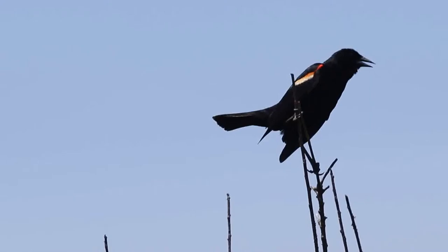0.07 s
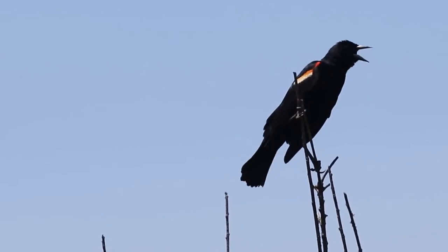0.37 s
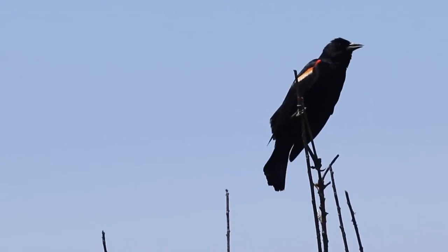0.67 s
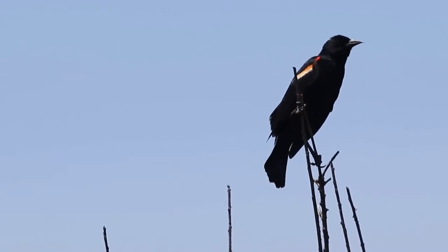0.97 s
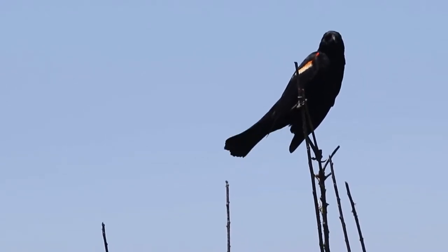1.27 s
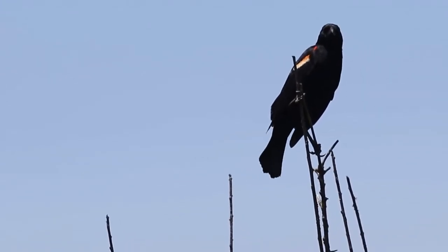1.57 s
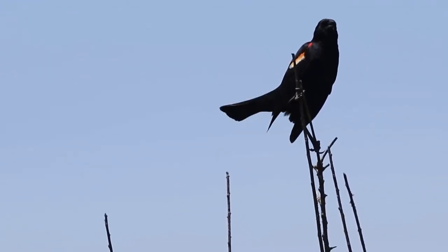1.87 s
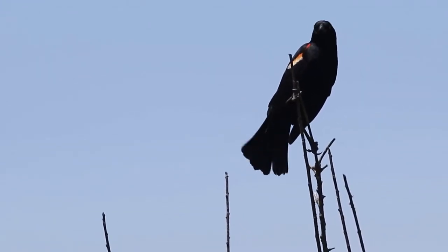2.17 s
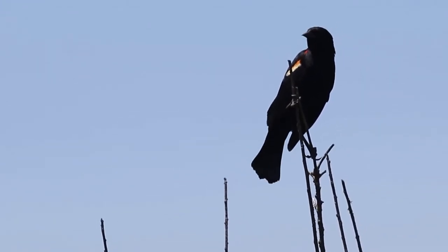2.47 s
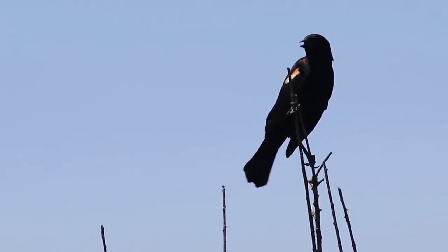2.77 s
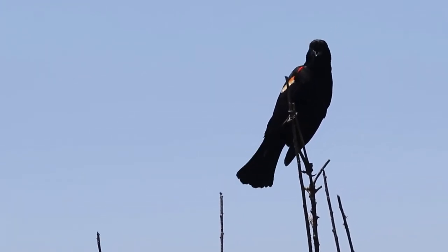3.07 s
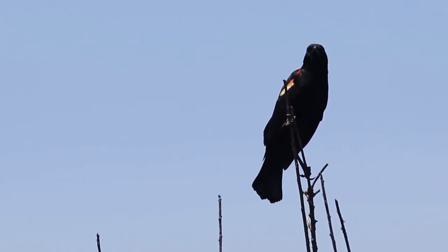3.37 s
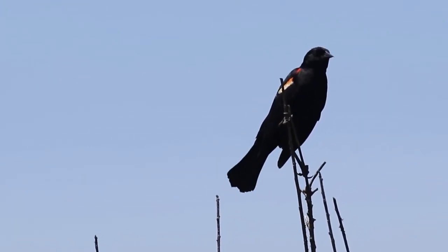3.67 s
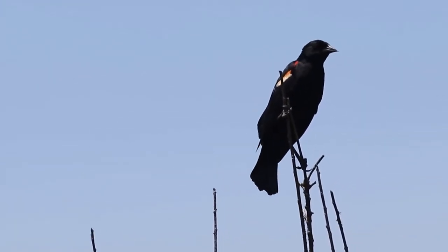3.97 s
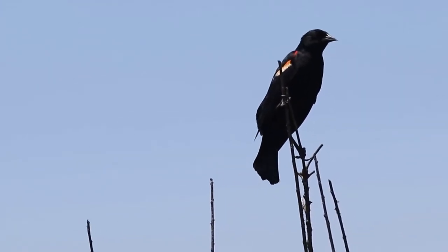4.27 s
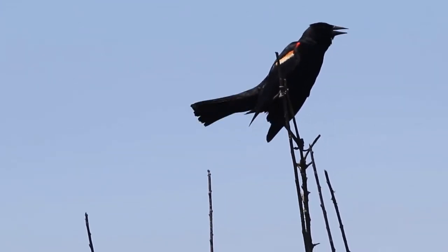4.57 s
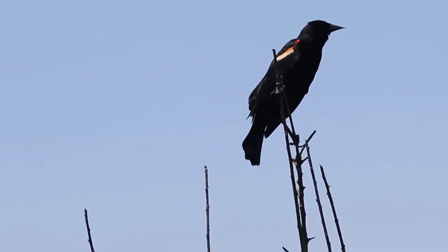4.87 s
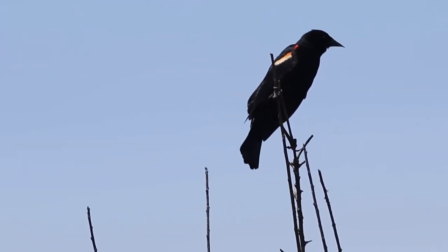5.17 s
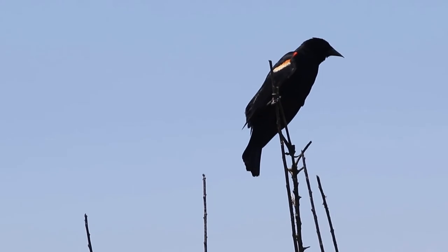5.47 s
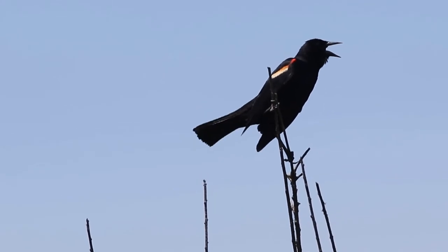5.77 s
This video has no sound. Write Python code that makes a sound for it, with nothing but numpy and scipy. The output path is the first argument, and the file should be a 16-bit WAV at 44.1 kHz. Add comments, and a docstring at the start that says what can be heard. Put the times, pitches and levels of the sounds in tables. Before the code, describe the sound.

A red-winged blackbird calls loudly and close by in the open air, with only a faint echo. A short, sharp, buzzy chuck comes at 0.1 seconds, followed from 0.4 to 0.7 by three quick, high, falling whistles. A second loud chuck sounds at 1.9 seconds. The triple whistle returns from 3.0 to 3.3, with a small cluster of soft, gritty knocks under its start. A third chuck comes at 4.6, and a last triple whistle runs from 5.7 to about 6 seconds. In the gaps, distant birds answer with faint chucks, tiny chirps and thin, echoing whistles. Feathers rustle very briefly near 1.7 and 3.4 seconds, and soft, dull low bumps fall around 0.5, 1.8 and 4.9. Throughout, distant traffic makes a low rumble with a faint tyre whine, slowly receding beneath a thin hiss of air.

```python
"""Short buzzy chucks and runs of three falling 'tew' whistles: a red-winged blackbird by a pond.
Both sides of its syrinx sound through one throat; reeds, the far bank and trees send back a faint echo.
Other birds answer from further off, feathers rustle, and there are a few soft knocks and dull bumps.
Distant traffic rumbles underneath, slowly receding."""
import sys
import numpy as np
from scipy import signal
from scipy.fft import rfft, irfft
from scipy.io import wavfile
from scipy.ndimage import map_coordinates

SR = 44100
rng = np.random.default_rng(int(sys.argv[2]) if len(sys.argv) > 2 else 0)


def generate_wav(signal):
    """Clip the signal to [-1, 1] and save it as 16-bit WAV at the path in sys.argv[1]."""
    frames = np.transpose(np.atleast_2d(signal))
    scaled = np.clip(frames, -1, 1) * 32767
    pcm = np.round(scaled).astype(np.int16)
    wavfile.write(sys.argv[1], SR, pcm)


N = 261513
TIME = np.arange(N) / SR
FLICK_S = .0016  # how fast a tew flicks upward as it cuts off
# Overtones of a whistling membrane. Each row: multiple of the pitch, level in dB.
WHISTLE_OVERTONES = [(2, -25.5), (3, -20.5), (4, -27)]


def blackbirds():
    """The near bird's runs of tews and three loud chucks, with four faint chucks from further off."""
    # Each row: start and length in seconds, settled pitch in Hz, late curl and closing flick as shares
    # of the pitch, level in dB, overtones in dB, their fade in dB per second as the beak closes.
    tews = [(.375, 0.11, 3677, .005, .12, -13, -3.5, 6),
            (.488, 0.11, 3584, -0.0081, 0.089, -11.5, -6.5, 14),
            (.601, 0.13, 3499, -0.011, 0.022, -12.5, -1, 298),
            (2.953, 0.1, 3833, 0.029, 0.063, -11.5, -4, 0),
            (3.061, 0.11, 3759, .033, 0.082, -12.5, -2.5, -2),
            (3.172, 0.14, 3772, 0.0077, 0.011, -13, 0, 170),
            (5.688, 0.11, 3774, 0.022, .12, -12.5, -1.5, 18),
            (5.796, 0.11, 3650, 0.028, 0.11, -13, -2.5, 6), (5.907, 0.13, 3580, -0.0025, 0, -14.5, -1, 200)]
    # Near and far chucks. Each row: start in seconds, pitch in Hz, tick, buzz and overtones in dB.
    chucks = [(0.1161, 2570, -14, -19.5, 0), (1.516, 2590, -47, -54, -6), (1.9119, 2528, -13, -19, -1.5),
              (2.2603, 2465, -34, -44.5, -8), (4.034, 2520, -46.5, -71, -10),
              (4.6222, 2532, -15, -19.5, -2.5), (4.909, 2470, -37.5, -48, -12)]
    out = np.zeros(N)
    for start, length, hz, curl, flick, db, overtone_db, fade_db_per_s in tews:
        add(out, start, undb(db) * tew(length, hz, curl, flick, overtone_db, fade_db_per_s))
    for start, *call in chucks:
        add(out, start, chuck(*call))
    return out


def tew(length, hz, curl, flick, overtone_db, fade_db_per_s):
    """The high side of the syrinx starts, the low side joins and clashes with it, then holds alone."""
    t = clock(length)
    settled_s, clash_s = .032, .018
    # the beak narrows as the pitch settles; on a run's last note it closes and shuts the overtones in
    beak_db = overtone_db * np.minimum(t / settled_s, 1) - fade_db_per_s * np.maximum(t - settled_s, 0)
    low = low_side(t, length, hz, curl, flick, beak_db, clash_s)
    high = high_side(t, hz)
    # the two sides share one air stream, which adds their sum tone
    sum_tone = signal.sosfilt(signal.butter(4, 10000, "high", fs=SR, output="sos"), low * high)
    rasp = noise([(2500, -26), (4000, 8.5), (7000, 10), (9500, -5), (13000, -11), (16000, -33)], 8192)
    clash = undb(-24.5 - 398.5 * abs(t - clash_s))
    cutoff = undb(-19.5) * np.exp((t - length) / FLICK_S)
    return low + high + undb(4.5) * sum_tone + undb(beak_db) * (clash + cutoff) * rasp[:len(t)]


def high_side(t, hz):
    """The bright squeak that opens a tew: nearly an octave up, swinging as it sinks."""
    swing_hz, sink_per_s = 90, 3.5
    pitch = hz * (1.88 - sink_per_s * t + .14 * np.cos(2 * np.pi * swing_hz * t))
    effort = envelope(t, attack_s=.0042, hold_s=.00067, release_s=.012, rise_db=15, fall_db=22)
    return syrinx(t, pitch, undb(.5) * effort, undb(17.5) * effort, WHISTLE_OVERTONES, jitter=.009)


def low_side(t, length, hz, curl, flick, beak_db, clash_s):
    """The body of a tew: it enters a fifth high, relaxes down to its pitch, swells and holds."""
    enters_s, swell_s, release_s = .006, .028, .29 * length
    slide_starts_s, slide_s = .0117, .0098
    slide = .49 * np.exp(-np.maximum(t - slide_starts_s, 0) / slide_s)
    ending = curl * hump(t, .763 * length, width=.0094) + flick * np.exp((t - length) / FLICK_S)
    drift = .002 * walk(t, 120)
    pitch = hz * (1 + slide + ending + drift)
    jitter = .002 + .028 * np.exp(-t / .013)
    hold_s = length - enters_s - swell_s - release_s
    effort = envelope(t - enters_s, swell_s, hold_s, release_s, rise_db=6.5, fall_db=26.5)
    # the overtones start grainy, clear up, and linger while the fundamental fades
    grain = 1 + .98 * np.exp(-t / .032) * walk(t, 2500)
    edge = undb(6 + beak_db) * effort ** .099 * grain
    stutter_db = 2.5 * walk(t, 450) * hump(t, clash_s, width=.009)
    return undb(stutter_db) * syrinx(t, pitch, undb(1.12) * effort, edge, WHISTLE_OVERTONES, jitter)


def chuck(hz, tick_db, buzz_db, overtone_db):
    """A high sagging tick, a break, then a lower climbing note that a fast warble turns into a buzz."""
    # Overtones of the buzzing membrane. Each row: multiple of the pitch, level in dB.
    buzz_overtones = [(2, -31), (3, -17), (4, -36), (5, -29), (6, -40)]
    break_s, warble_starts_s, warble_hz = .0165, .026, 256
    t = clock(.07)
    sag = .11 * (1 - np.exp(-t / .006))
    effort = envelope(t, attack_s=.0014, hold_s=.0033, release_s=.01, rise_db=12, fall_db=33)
    edge = undb(10 + overtone_db) * effort
    tick = syrinx(t, hz * (1.525 - sag), effort, edge, WHISTLE_OVERTONES, jitter=.0048)

    age = t - break_s
    warble = np.sin(2 * np.pi * warble_hz * np.maximum(t - warble_starts_s, 0))
    climb = .14 * (1 - np.exp(-np.maximum(age, 0) / .02))
    pitch = hz * (1 + climb) * (1 + .058 * warble)
    effort = envelope(age, attack_s=.0013, hold_s=.027, release_s=.02, rise_db=16, fall_db=16.5)
    effort *= 1 - .25 * warble
    clean_accent = undb(8.5 * hump(t, centre=.0214, width=.0028))
    edge = undb(overtone_db - 4) * effort
    buzz = syrinx(t, pitch, clean_accent * effort, edge, buzz_overtones, jitter=.016)
    # the membrane rasps as it changes register
    rasp = noise([(2000, -27), (3500, 16), (6000, 1), (8500, 2), (13000, 7), (16000, -7)], 4096)
    rasp_db = overtone_db - 21 - 682 * abs(age)
    return undb(tick_db) * tick + undb(buzz_db) * (buzz + undb(rasp_db) * rasp[:len(t)])


def syrinx(t, hz, tone_gain, overtone_gain, harmonics, jitter):
    """One vibrating membrane: an unsteady tone whose harmonics sweep through the throat's resonances."""
    # Resonance of the throat and open beak. Each row: frequency in Hz, gain in dB.
    throat = [(2600, -0.5), (3800, 0.5), (5000, -2.5), (6600, -3.5), (7600, -4.5), (9500, -7), (11000, -10),
              (13000, -4), (15500, -12)]
    pitch = hz * (1 + jitter * walk(t, 1486))
    phase = 2 * np.pi * np.cumsum(pitch) / SR
    fundamental = gain_at(pitch, throat) * np.sin(phase)
    overtones = sum(undb(db) * gain_at(k * pitch, throat) * (k * pitch < SR / 2) * np.sin(k * phase)
                    for k, db in harmonics)
    shimmer = undb(4 * walk(t, 122))
    flutter = undb(.6 * walk(t, 170))
    return flutter * (tone_gain * fundamental + overtone_gain * shimmer * overtones)


def far_birds():
    """Neighbours across the pond: tews, triple chirps and thin whistles."""
    # Each row: start in seconds, length in seconds, settled pitch in Hz, level in dB.
    far_tews = [(1.581, 0.088, 4000, -57), (2.12, 0.1, 4160, -46.5), (2.219, 0.13, 4094, -49),
                (2.338, 0.12, 4100, -47.5), (3.406, 0.13, 3990, -43.5), (4.734, .1, 4880, -54)]
    # A small bird's triple chirps. Each row: start in seconds, level in dB.
    chirps = [(.225, -57), (1.317, -57.5), (1.705, -52), (2.028, -58), (2.405, -53), (2.675, -54.5),
              (3.795, -56), (4.158, -58.5), (4.775, -56), (5.058, -53.5)]
    # Each row: start and length in seconds, first and last pitch in Hz, level in dB,
    # waver as a share of the pitch.
    whistles = [(1.795, 0.16, 3360, 3630, -53.5, 0.0052), (2.66, 0.059, 2920, 3140, -52, 0.0065),
                (2.785, .04, 3120, 2850, -57, .006), (2.88, 0.051, 2840, 2640, -54, .006),
                (4.892, .11, 4640, 4580, -57.5, 0.0033), (5.346, .07, 5560, 5530, -61, 0.021),
                (5.44, 0.03, 4950, 4850, -60, .006), (5.585, 0.13, 5680, 5430, -56, 0.023)]
    answers = np.zeros(N)
    for start, length, hz, db in far_tews:
        add(answers, start, undb(db) * tew(length, hz, curl=0, flick=0, overtone_db=-11, fade_db_per_s=0))
    # distance takes the top off their notes
    out = signal.sosfilt(signal.butter(4, 5000, fs=SR, output="sos"), answers)
    for start, db in chirps:
        for k in range(3):
            add(out, start + k * .035, undb(db) * whistle(.015, start_hz=5350, end_hz=4870, waver=.006))
    for start, length, start_hz, end_hz, db, waver in whistles:
        add(out, start, undb(db) * whistle(length, start_hz, end_hz, waver))
    return out


def whistle(length, start_hz, end_hz, waver):
    """A pure, wavering glide that swells and fades."""
    t = clock(length)
    pitch = (start_hz + (end_hz - start_hz) * t / length) * (1 + waver * walk(t, 307))
    return np.sin(np.pi * t / length) * np.sin(2 * np.pi * np.cumsum(pitch) / SR)


def rustles():
    """Feathers brush past each other as the bird flicks its tail."""
    # Each row: start in seconds, length in seconds, level in dB.
    tail_flicks = [(1.692, 0.045, -40), (3.37, 0.038, -38)]
    # Colour of brushing feathers. Each row: frequency in Hz, level in dB.
    feathers = [(1500, -28), (2800, -10), (3800, 6), (5500, -14), (9000, -24), (13000, -27), (16000, -45)]
    out = np.zeros(N)
    for start, length, db in tail_flicks:
        t = clock(length)
        brush = np.sin(np.pi * t / length) * undb(db + 2 * walk(t, 333))
        add(out, start, brush * noise(feathers, 4096)[:len(t)])
    return out


def knocks():
    """Soft, gritty knocks: bursts of noise ring a dull body under a dry top."""
    # Each row: start in seconds, decay in seconds, level in dB, boost of the two low modes in dB.
    hits = [(3.0232, 0.0059, -23.5, 0.5), (3.0467, 0.0039, -25, 0), (3.091, 0.0097, -35.5, 7),
            (3.1007, .003, -24, -12)]
    # Each row: frequency in Hz, bandwidth in Hz, level in dB.
    modes = [(368, 76, 0.5), (1090, 700, -2), (2080, 480, -1)]
    out, t = np.zeros(N), clock(.06)
    for start, decay, db, body_db in hits:
        grit = rng.standard_normal(len(t)) * np.exp(-t / decay)
        for k, (hz, width, mode_db) in enumerate(modes):
            b, a = signal.iirpeak(hz, hz / width, fs=SR)
            ring = signal.lfilter(b, a, signal.lfilter(b, a, grit)) * np.sqrt(SR / width / 2)
            add(out, start, undb(db + mode_db + body_db * (k < 2)) * ring)
    return out


def bumps():
    """Dull low swells, each only a few cycles long."""
    # Each row: centre in seconds, width in seconds, pitch in Hz, level in dB.
    swells = [(.505, 0.022, 93.5, -28), (1.83, 0.0047, 161, -22), (4.581, .008, 169, -38),
              (4.912, 0.014, 113, -30.5)]
    return sum(undb(db) * hump(TIME, centre, width) * np.sin(2 * np.pi * hz * (TIME - centre))
               for centre, width, hz, db in swells)


def pond_echo(sound, reeds_db, echo_s, echo_db, tail_db, t60):
    """Reeds scatter at once, the bank gives a ragged echo, and the trees beyond a long thin tail."""
    t = clock(1.6)
    reeds, bank, trees = rng.standard_normal((3, len(t)))
    reeds *= np.exp(-t / .085) * (t > .006)
    bank *= np.exp(-abs(t - echo_s) / .016) * (t > echo_s)
    # the tree line across the water makes the tail swell once more
    swell_db = 5 * hump(t, centre=.52, width=.07)
    trees *= undb(-60 * t / t60 + swell_db) * np.minimum(t / echo_s, 1)
    response = undb(reeds_db) * unit(reeds) + undb(echo_db) * unit(bank) + undb(tail_db) * unit(trees)
    # leaves and air soak up the overtones
    response = signal.sosfilt(signal.butter(4, 5200, fs=SR, output="sos"), response / np.sqrt(len(t)))
    return signal.fftconvolve(sound, response)[:N]


def traffic():
    """Far engines rumble and drone; tyres roar and whine as they recede."""
    # Colours of the road and of the tyre whine. Each row: frequency in Hz, level in dB.
    road_colour = [(12, -44), (20, -22), (38, -11.5), (53, -3), (81, -1.5), (120, -3), (225, -4),
                   (258, -6.5), (346, -6.5), (430, -10), (456, -9), (963, -9), (1840, -16.5), (2200, -25.5),
                   (2860, -62), (4840, -120)]
    whine_colour = [(700, -10), (880, 9), (960, 13), (1030, 9.5), (1200, -34.5)]
    road = noise(road_colour, N)
    lows = signal.sosfiltfilt(signal.butter(3, 350, fs=SR, output="sos"), road)
    rumble = unit(lows) * receding(-36, fade_db_per_s=.4) * undb(.5 * walk(TIME, 9.2))
    roar = unit(road - lows) * receding(-37.5, fade_db_per_s=.25) * undb(.39 * walk(TIME, 5.58))
    whine = noise(whine_colour, N) * receding(-44, fade_db_per_s=1.1)
    engine_hz = 71.6 * (1 + .027 * walk(TIME, 9))
    drone = undb(-43.5 + 1.5 * walk(TIME, 2.48)) * np.sin(2 * np.pi * np.cumsum(engine_hz) / SR)
    return rumble + roar + whine + drone


def air():
    """A thin, steady hiss of open air."""
    # Each row: frequency in Hz, level in dB.
    hiss_colour = [(1500, -14.5), (2200, 3), (3000, -4), (4000, -10.5), (6000, -15), (10000, -17.5),
                   (16000, -25)]
    return undb(-55) * noise(hiss_colour, N)


def receding(start_db, fade_db_per_s):
    """Gain of a source that slowly moves away."""
    return undb(start_db - fade_db_per_s * TIME)


def envelope(t, attack_s, hold_s, release_s, rise_db, fall_db):
    """Gain that climbs, holds and falls away, gated with half-millisecond edges."""
    attack = np.clip(1 - t / attack_s, 0, 1)
    release = np.maximum(t - attack_s - hold_s, 0) / release_s
    gate = np.clip(np.minimum(t, attack_s + hold_s + release_s - t) / .0005, 0, 1)
    return undb(-rise_db * attack - fall_db * release) * gate


def hump(t, centre, width):
    """A bell-shaped swell of height 1."""
    return np.exp(-((t - centre) / width) ** 2)


def walk(t, rate):
    """A smooth random wobble of spread near 1, with rate steps a second."""
    return map_coordinates(rng.standard_normal(512), [t * rate], order=3, mode="wrap")


def noise(spectrum, size):
    """Noise of rms 1 in the colour of a (Hz, dB) spectrum, size samples long."""
    colour = gain_at(np.fft.rfftfreq(size, 1 / SR), spectrum)
    return unit(irfft(rfft(rng.standard_normal(size)) * colour, size))


def gain_at(hz, spectrum):
    """Gain of a (Hz, dB) spectrum at any frequency."""
    points_hz, db = np.transpose(spectrum)
    return undb(np.interp(np.log(np.maximum(hz, 1)), np.log(points_hz), db))


def undb(db):
    """Decibels to gain."""
    return 10 ** (np.asarray(db) / 20)


def unit(x):
    """Scale to rms 1."""
    return x / np.sqrt(np.mean(x ** 2))


def clock(length):
    """Sample times of a short sound."""
    return np.arange(int(length * SR)) / SR


def add(out, start, sound):
    """Mix a sound in at a time in seconds."""
    i = max(int(start * SR), 0)
    out[i:i + len(sound)] += sound[:max(N - i, 0)]


def scene():
    """The main calls almost dry, far tews and whistles washed in echo, the road behind them all."""
    main, far = blackbirds() + rustles(), far_birds()
    echoes = pond_echo(main, reeds_db=-29, echo_s=.118, echo_db=-29, tail_db=-35.5, t60=3.0)
    echoes += pond_echo(far, reeds_db=-5, echo_s=.15, echo_db=-22, tail_db=-10.5, t60=1.6)
    return (main + far + echoes + knocks() + bumps() + traffic() + air())[None]


def record(dry):
    """The microphone opens a moment in and cuts the highest treble."""
    opens_s, top_hz = .072, 15950
    opened = np.clip((TIME - opens_s) / .00076, 0, 1)
    return signal.sosfilt(signal.ellip(10, .2, 80, top_hz, fs=SR, output="sos"), dry * opened)


dry = scene()
out = record(dry)
generate_wav(out)
```